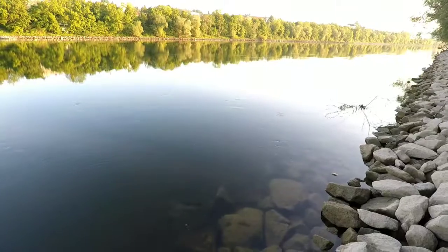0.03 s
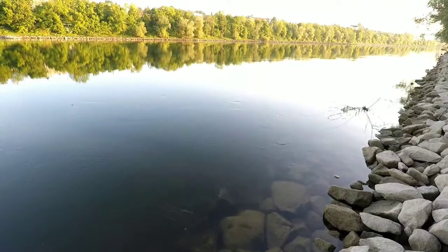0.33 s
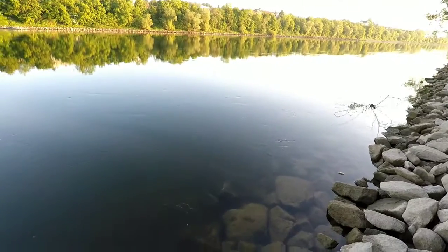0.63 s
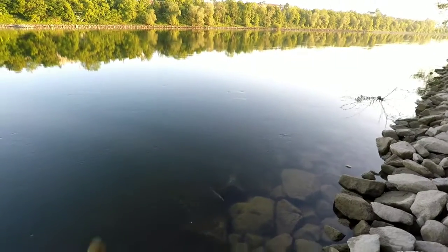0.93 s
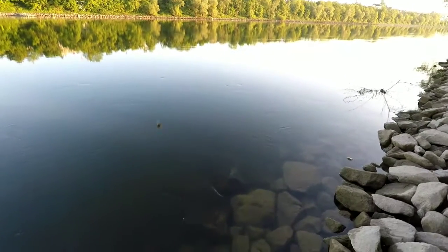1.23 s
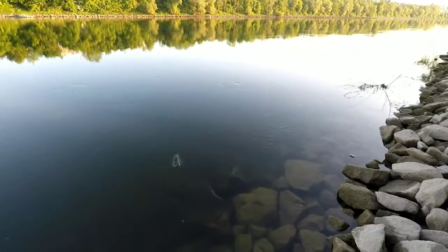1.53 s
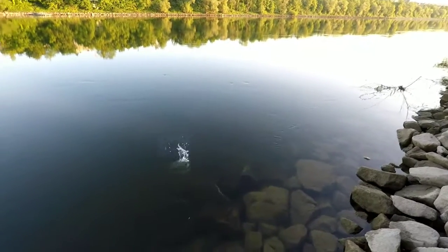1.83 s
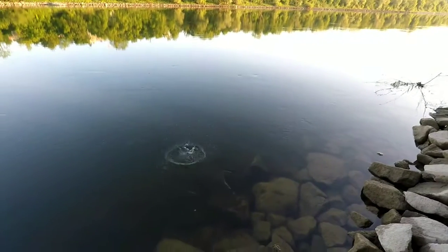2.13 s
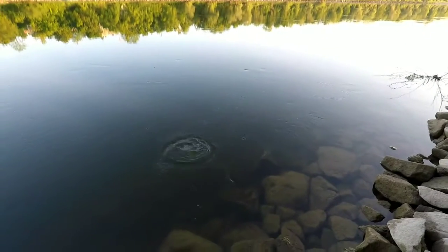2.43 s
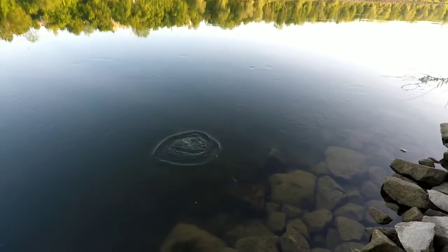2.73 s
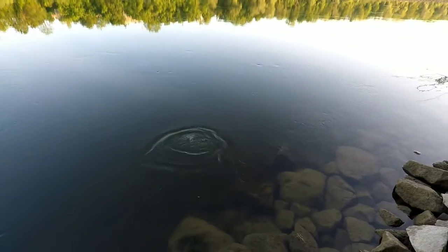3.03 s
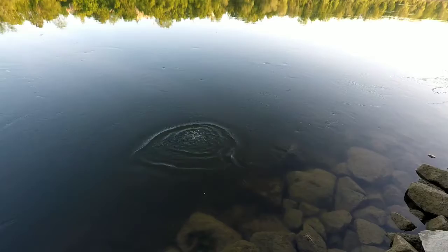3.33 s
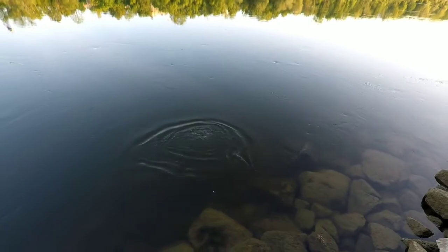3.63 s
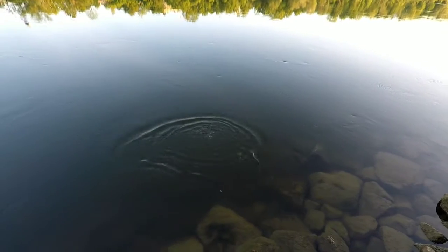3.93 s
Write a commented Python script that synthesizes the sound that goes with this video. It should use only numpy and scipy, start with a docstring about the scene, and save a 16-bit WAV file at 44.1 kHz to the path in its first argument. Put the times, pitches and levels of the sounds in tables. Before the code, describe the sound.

One sharp plop and splash of a stone in a river, with low outdoor rumble.

```python
"""Far traffic, a throbbing far engine and a breeze on the microphone fade in and widen from mono.
Three short high bird chips come just before a stone drops into a calm river by a rocky bank, at 1.67 s:
slap and cavity ring as large bubbles, and the torn surface gives a bright splash. Thrown droplets
patter back for about 0.7 s, ticking and ringing tiny bubbles, reflected by the bank.
Faint birds call over the background to the end."""
import sys
import numpy as np
from scipy import signal
from scipy.fft import rfft, irfft
from scipy.io import wavfile
from scipy.ndimage import uniform_filter1d

SR = 44100
rng = np.random.default_rng(int(sys.argv[2]) if len(sys.argv) > 2 else 0)


def put_to_file(sound):
    """Save the sound as 16-bit audio at rate SR, in the file named by the first command-line argument."""
    columns = np.atleast_2d(sound).T  # one column per channel
    safe = np.clip(columns, -1, 1)
    whole_steps = np.round(safe * 32767)
    wavfile.write(sys.argv[1], SR, whole_steps.astype(np.int16))


N = 176400
TIME = np.arange(N) / SR
BINS_HZ = np.fft.rfftfreq(N, 1 / SR)
DROP_RISE_PER_S = 10  # pitch rise / start pitch

# air pockets opened by the stone: t/s, f/Hz, rise/(Hz/s), level/dB, attack/s, t60/s
POCKETS = [(1.6695, 475, 6500, 5, .0012, .027), (1.6725, 148, 450, -11.5, .003, .38),
           (1.688, 420, 0, -21, .002, .08), (1.725, 510, 400, -19.5, .004, .07)]
# splash bubbles: t/s, f/Hz, level/dB, t60/s
SPLASH_BUBBLES = [(1.6695, 760, -3, .011), (1.6693, 1180, -4, .011), (1.6695, 1520, -10, .022),
                  (1.672, 1950, -17, .025), (1.6705, 2200, -22, .1), (1.6712, 2760, -12, .019),
                  (1.672, 3590, -3.5, .022), (1.6726, 3910, -5.5, .025), (1.673, 4400, -6, .012),
                  (1.6735, 5450, -18, .04), (1.674, 5750, -15, .04), (1.6712, 6220, -4, .021),
                  (1.673, 6950, -1.5, .015), (1.6724, 8500, -9, .008), (1.685, 1630, -25, .06)]
# burst, fizz and tick spectra: f/Hz, level/dB
BURST_SPECTRUM = [(300, -26), (700, -5), (1500, -8), (3000, 2), (4200, 5), (7200, 2), (8300, -2),
                  (10500, -11), (15000, -22)]
FIZZ_SPECTRUM = [(400, -6), (1200, -3), (2300, 13), (3000, -3), (4000, 9), (6500, 7), (8500, 4),
                 (11000, -6), (15000, -35)]
TICK_SPECTRUM = [(1000, 2), (2500, -7), (4000, 0), (6500, 8), (9000, -3), (12000, -8), (15000, -19)]
# three bird chips before the stone lands, then droplets: t/s, f/Hz, tone level/dB, tick level/dB
CHIPS_AND_DROPS = [(1.594, 5600, -17, -27), (1.606, 6530, -33, -32), (1.6444, 6300, -18, -30),
                   (1.712, 2700, -23, -20.5), (1.7628, 3940, -22, -39), (1.780, 6000, -20, -39),
                   (1.799, 3300, -22, -37), (1.806, 6300, -20, -40), (1.821, 6440, -23, -36),
                   (1.8304, 5850, -10, -18.5), (1.8331, 4300, -22, -26), (1.838, 3570, -27, -38),
                   (1.939, 2400, -29, -34), (1.941, 6200, -31, -41), (1.977, 3780, -22, -35),
                   (1.998, 3370, -31, -40), (2.01, 3970, -29, -31), (2.0225, 5860, -20, -28),
                   (2.024, 4600, -22, -29), (2.056, 3980, -19, -30), (2.057, 5000, -19, -36),
                   (2.066, 6240, -20, -33), (2.094, 7040, -28, -36), (2.1325, 3940, -35, -41),
                   (2.219, 6200, -40, -38), (2.252, 6600, -28, -30), (2.302, 5000, -45, -38),
                   (2.3934, 6210, -38, -29.5)]
# falling spray: t/s, level/dB
SPRAY_ENVELOPE = [(1.68, -54.5), (1.72, -33.5), (1.77, -51), (1.83, -44), (1.86, -56), (1.91, -52),
                  (1.94, -45), (1.97, -48), (2.03, -38), (2.075, -37.5), (2.11, -46.5), (2.26, -49.5),
                  (2.33, -57), (2.6, -54)]
# bird notes: t/s, length/s, start f/Hz, end f/Hz, level/dB
BIRD_NOTES = [(1.6, .05, 2560, 2530, -45), (1.9, .12, 2530, 2520, -44.5), (2.21, .035, 6750, 6400, -49),
              (2.244, .04, 6550, 6950, -48.5), (2.466, .027, 3530, 2950, -46),
              (2.503, .045, 3290, 3600, -50), (2.594, .024, 5900, 5500, -47),
              (3.352, .032, 2640, 2690, -41.5), (3.388, .09, 2620, 2570, -43), (3.535, .1, 2200, 2130, -43),
              (3.617, .03, 3550, 3380, -47), (3.835, .04, 2310, 2960, -45.5), (3.946, .01, 6700, 5100, -41)]
# traffic roar: f/Hz, level/dB
TRAFFIC_SPECTRUM = [(60, -42), (120, -4.5), (150, -1.5), (190, 0), (245, -7.5), (290, -8), (400, -13),
                    (520, -16), (720, -19.5), (1000, -11.5), (1500, -14), (2100, -20), (2500, -30),
                    (3200, -33), (4700, -42), (5800, -39.5), (7500, -42.5), (10500, -41.5), (15000, -57)]
# traffic, left against right: f/Hz, coherence/1
TRAFFIC_COHERENCE = [(60, 1), (200, 1), (400, 0.76), (620, 0.29), (1000, 0.68), (1500, 0.71), (2100, 1),
                     (2600, 0.47), (3500, 0.22), (5200, 0.031)]
# traffic, left lead: f/Hz, phase/rad
TRAFFIC_LEAD = [(100, 0.56), (560, -1.16), (700, 1.5), (1100, 2.5), (2200, 2), (2800, 0.47), (5000, 1)]
# traffic, left minus right: f/Hz, level/dB
TRAFFIC_BALANCE = [(110, 1.5), (200, -6), (370, -2.5), (690, -5.5), (1270, 2), (2330, 0), (4290, 0.5),
                   (7900, -1.5), (14500, 1)]
# engine and breeze envelopes: t/s, level/dB
ENGINE_ENVELOPE = [(0, -1), (1.3, 9), (1.8, 5.5), (2.6, 4), (4, -2)]
BREEZE_ENVELOPE = [(0, -19.5), (.25, -15), (.5, -22.5), (.95, -14.5), (1.2, -16), (1.5, -16), (1.65, -20),
                   (1.85, -13), (1.97, -20.5), (2.15, -20.5), (2.4, -20.5), (2.75, -19.5), (3, -23),
                   (3.2, -23.5), (3.6, -27.5), (4, -30.5)]
# breeze rumble: f/Hz, level/dB
BREEZE_SPECTRUM = [(8, 0), (18, -7.5), (32, -2.5), (62, -9.5), (100, -13.5), (140, -29), (300, -24.5),
                   (1000, -53), (4000, -85)]
# eddies at the right microphone port: t/s, f/Hz, level/dB
EDDIES = [(1.779, 45, -5), (1.865, 62, -2), (1.896, 52, -4), (2.209, 50, -11), (2.557, 125, -6),
          (2.737, 62, -4), (2.831, 52, -4)]
# fade-in, normalised in use to its end value: t/s, level/dB
FADE_IN = [(0, -19.5), (.25, -16), (.5, -13), (1, -8), (1.3, -5), (1.6, -4), (2, -3)]
# stereo width: t/s, side gain/1
WIDTH = [(1.1, 0.034), (1.3, 0.33), (1.6, 0.52), (1.75, 0.85)]


def amp(db):
    """dB to gain."""
    return 10 ** (np.asarray(db) / 20)


def unit(x):
    """Scale to rms 1."""
    return x / np.sqrt(np.mean(x ** 2) + 1e-20)


def at_hz(points, hz):
    """Interpolate over log frequency."""
    f, value = np.transpose(points)
    return np.interp(np.log(hz + 1), np.log(f), value)


def envelope(points):
    """Gain per sample from t/s, level/dB."""
    return amp(np.interp(TIME, *np.transpose(points)))


def pan(db):
    """Stereo gains for left minus right in dB."""
    gains = amp(np.array([[db], [-db]]) / 2)
    return gains / gains.mean()


def add(mix, at_s, sound):
    """Mix in place."""
    part = mix[..., round(at_s * SR):][..., :sound.shape[-1]]
    part += sound[..., :part.shape[-1]]


def noise(spectrum):
    """Two independent channels of coloured noise."""
    return unit(irfft(rfft(rng.standard_normal((2, N))) * amp(at_hz(spectrum, BINS_HZ)), N))


def drift(rate_hz):
    """Low-passed random motion, rms 1."""
    return unit(irfft(rfft(rng.standard_normal(N)) * np.exp(-(BINS_HZ / rate_hz) ** 2), N))


def echoes(x, t60_s):
    """Scattered reflections, different per side."""
    t = TIME[:SR // 2]
    taps = rng.standard_normal((2, len(t))) * (rng.random((2, len(t))) < .08)
    taps = taps * (t > .003) * amp(-60 * t / t60_s)
    return signal.fftconvolve(x, taps / np.linalg.norm(taps[0]), axes=1)[:, :N]


def ping(hz, rise_hz_per_s, attack_s, t60_s):
    """Damped sine with rising pitch, as of a bubble nearing the surface."""
    t = TIME[:int(t60_s * SR)]
    tone = np.sin(2 * np.pi * (hz * t + rise_hz_per_s * t ** 2 / 2))
    return tone * (1 - np.exp(-t / attack_s)) * amp(-60 * t / t60_s)


def plop():
    """Slap and cavity behind the stone ring as large bubbles."""
    out = np.zeros(N)
    for at_s, hz, rise_hz_per_s, db, attack_s, t60_s in POCKETS:
        add(out, at_s, amp(db) * ping(hz, rise_hz_per_s, attack_s, t60_s))
    return out * pan(-4.5)


def splash(peak_s=1.6741, rise_s=.0026, fall_s=.0043, fizz_t60_s=.25):
    """The surface tears: noise burst, cluster of small bubbles, fizzing tail."""
    age_s = TIME - peak_s
    burst = np.exp(np.minimum(age_s / rise_s, -age_s / fall_s))
    out = amp(-13) * burst * noise(BURST_SPECTRUM)[0]
    for at_s, hz, db, t60_s in SPLASH_BUBBLES:
        add(out, at_s, amp(db) * ping(hz, 0, attack_s=.002, t60_s=t60_s))
    fizz = noise(FIZZ_SPECTRUM) * (age_s > 0) * amp(-26 - 60 * np.maximum(age_s, 0) / fizz_t60_s)
    return out * pan(-4.8) + fizz * pan(-3.5)


def chips_and_droplets(tick_decay_s=.0015):
    """Three short high bird chips before the stone lands, then droplets ticking and ringing bubbles."""
    out, hiss = np.zeros(N), noise(TICK_SPECTRUM)[0]
    for at_s, hz, tone_db, tick_db in CHIPS_AND_DROPS:
        add(out, at_s, amp(tone_db) * ping(hz, hz * DROP_RISE_PER_S, attack_s=.0008, t60_s=.01))
        tick = hiss[round(at_s * SR):][:SR // 20]
        add(out, at_s, amp(tick_db) * tick * np.exp(-TIME[:len(tick)] / tick_decay_s))
    return out * pan(-5)


def spray(drops_per_s=950, low_hz=2780, high_hz=9180, pitches=40):
    """Fine drops fall back at random, one short bubble each."""
    out = np.zeros((2, N))
    for hz in np.geomspace(low_hz, high_hz, pitches):
        hits = rng.random(N) < drops_per_s / pitches / SR
        strength = amp(-3 * np.minimum(rng.exponential(1, N), 3))
        ring = ping(hz, hz * DROP_RISE_PER_S, attack_s=.0001, t60_s=rng.uniform(.003, .0046))
        out += signal.oaconvolve(hits * strength, ring)[:N] * pan(-4.5 + 2 * rng.standard_normal())
    return unit(out) * envelope(SPRAY_ENVELOPE)


def birds():
    """Thin wavering glides from the trees, with echoes."""
    out, waver = np.zeros(N), 1 + .014 * drift(rate_hz=130)
    for at_s, length_s, start_hz, end_hz, db in BIRD_NOTES:
        progress = np.linspace(0, 1, int(length_s * SR))
        hz = (start_hz + (end_hz - start_hz) * progress) * waver[round(at_s * SR):][:len(progress)]
        arch = np.sqrt(4 * progress * (1 - progress))
        add(out, at_s, amp(db) * arch * np.sin(2 * np.pi * np.cumsum(hz) / SR))
    out = out * pan(-5.5)
    return out + amp(-6) * echoes(out, t60_s=.3)


def traffic(flicker_db=1.34):
    """Far, even roar; reaches the two microphone ports out of step."""
    frames = dict(nperseg=2048, noverlap=1536)
    hz, _, (left, other) = signal.stft(rng.standard_normal((2, N)), SR, **frames)
    coherence = at_hz(TRAFFIC_COHERENCE, hz)[:, None]
    right = coherence * left + np.sqrt(1 - coherence ** 2) * other
    right = right * np.exp(-1j * at_hz(TRAFFIC_LEAD, hz))[:, None]
    flicker = uniform_filter1d(rng.standard_normal(left.shape), size=14, axis=0)
    flicker = unit(uniform_filter1d(flicker, size=8, axis=1))
    sides_db = np.array([[1], [-1]]) * at_hz(TRAFFIC_BALANCE, hz) / 2
    shape_db = (at_hz(TRAFFIC_SPECTRUM, hz) + sides_db)[:, :, None] + flicker_db * flicker
    _, roar = signal.istft(np.array([left, right]) * amp(shape_db), **frames)
    return amp(-26.5) * unit(roar[:, :N])


def engine(hum_hz=209.9, waver_hz=2.344, throb_hz=8.95, crest_s=1.757):
    """Far engine: wavering hum, overmodulated by a rough throb."""
    throb = 1 + 2.8 * np.cos(2 * np.pi * throb_hz * (TIME - crest_s)) + .3 * drift(rate_hz=16.6)
    hz = hum_hz + waver_hz * drift(rate_hz=8.2)
    hum = throb * np.sin(2 * np.pi * np.cumsum(hz) / SR)
    return amp(-34) * unit(hum) * envelope(ENGINE_ENVELOPE)


def breeze(coherence=.55, eddy_width_cycles=.69):
    """Low rumble at the ports; single eddies suck and rebound on the right."""
    left, other = noise(BREEZE_SPECTRUM)
    right = coherence * left + np.sqrt(1 - coherence ** 2) * other
    out = np.array([left, right]) * envelope(BREEZE_ENVELOPE) * pan(-3)
    for at_s, hz, db in EDDIES:
        cycles = (TIME - at_s) * hz
        suction = np.cos(2 * np.pi * cycles) * np.exp(-(cycles / eddy_width_cycles) ** 2)
        out -= amp(db) * suction * amp([[-43], [0]])
    return out


def scene(right_delay_s=.00004):
    """Water and bird chips, slightly later at the right port, over the open-air background."""
    patter = chips_and_droplets() + spray()
    impact = plop() + splash()
    bank = amp(-12) * echoes(patter, t60_s=.1)
    left, right = impact + patter + bank
    right = irfft(rfft(right) * np.exp(-2j * np.pi * BINS_HZ * right_delay_s), N)
    return np.array([left, right]) + birds() + traffic() + engine() + breeze()


def record(dry, cutoff_hz=15150):
    """Widen from mono, fade in, clip at full scale, low-pass."""
    mid, fade = dry.mean(0), envelope(FADE_IN)
    wide = mid + (dry - mid) * np.interp(TIME, *np.transpose(WIDTH))
    clipped = np.clip(wide * fade / fade[-1], -1, 1)
    lowpass = signal.firwin(511, cutoff_hz, window=("kaiser", 9), fs=SR)
    return signal.oaconvolve(clipped, lowpass[None], "same")


dry = scene()
out = record(dry)
put_to_file(out)
```